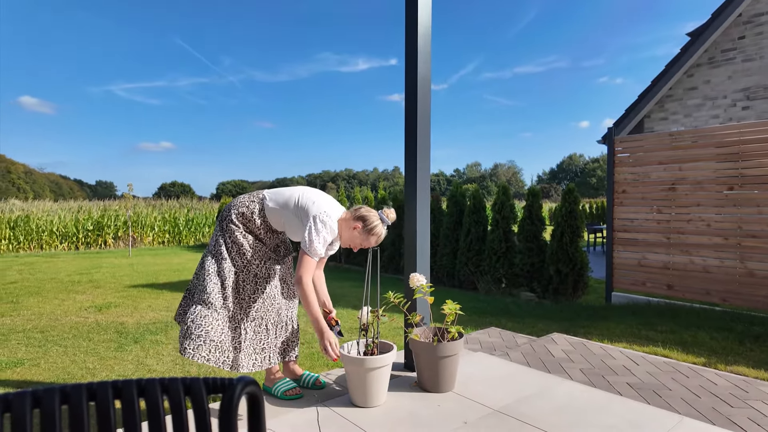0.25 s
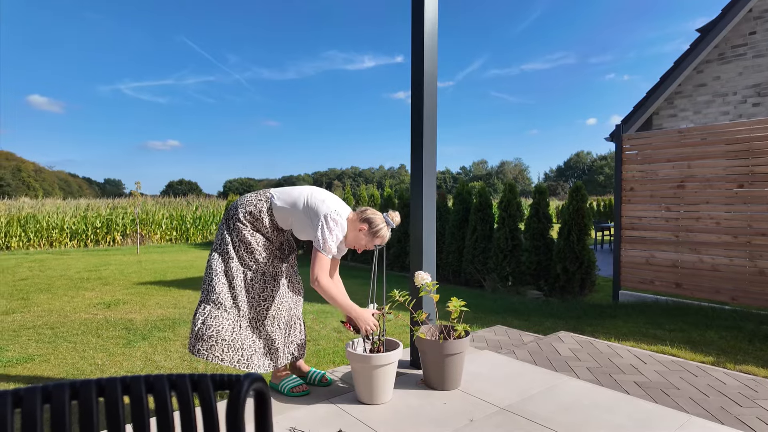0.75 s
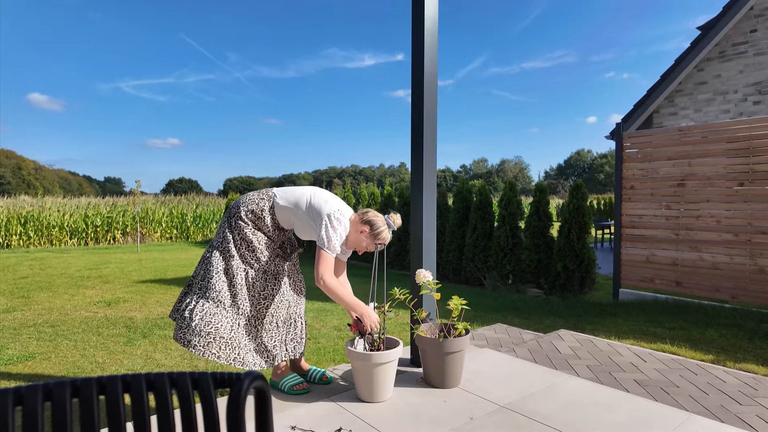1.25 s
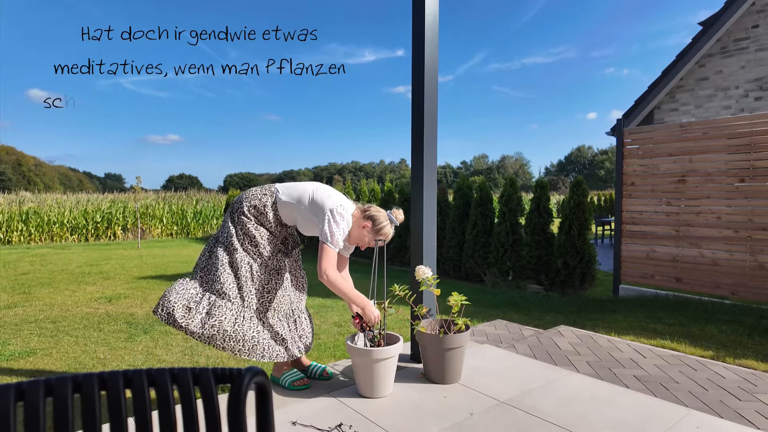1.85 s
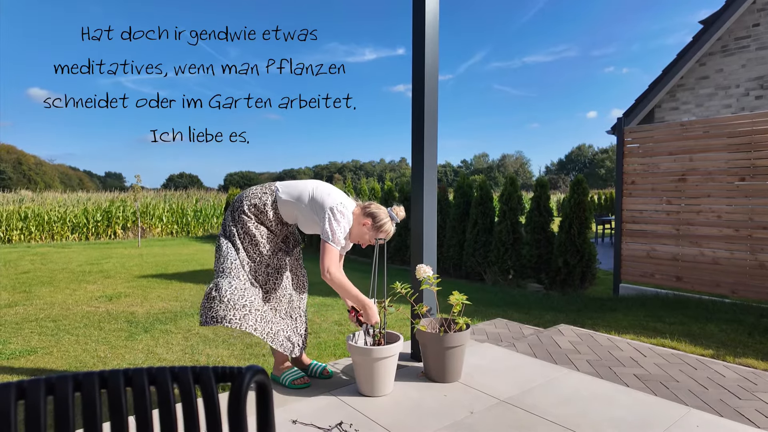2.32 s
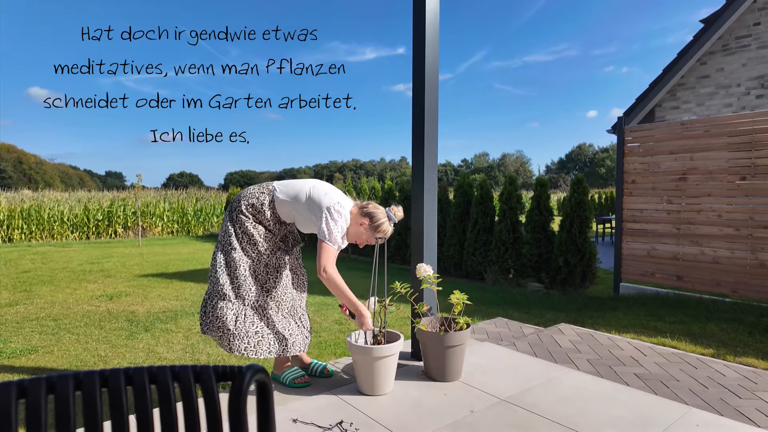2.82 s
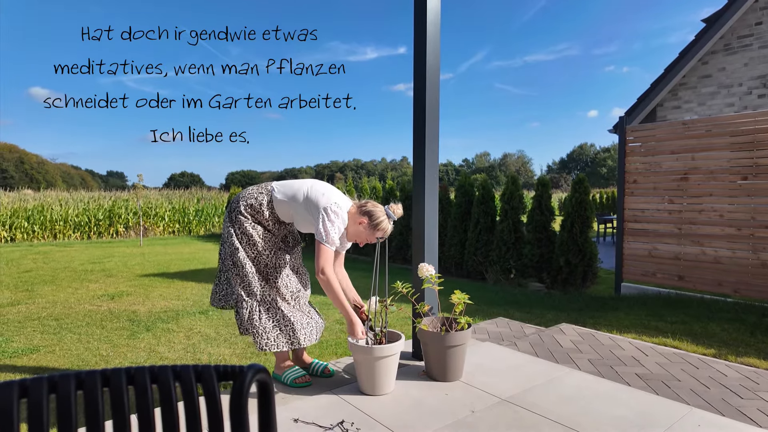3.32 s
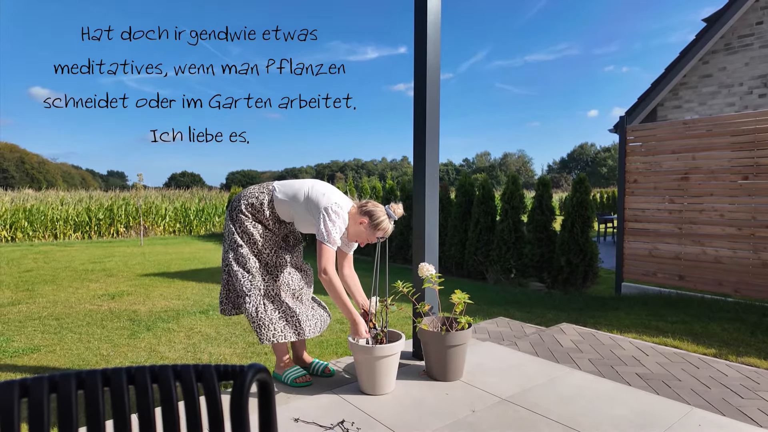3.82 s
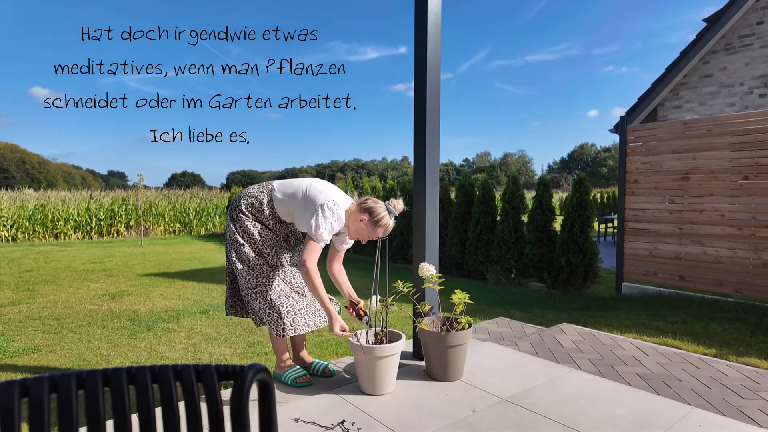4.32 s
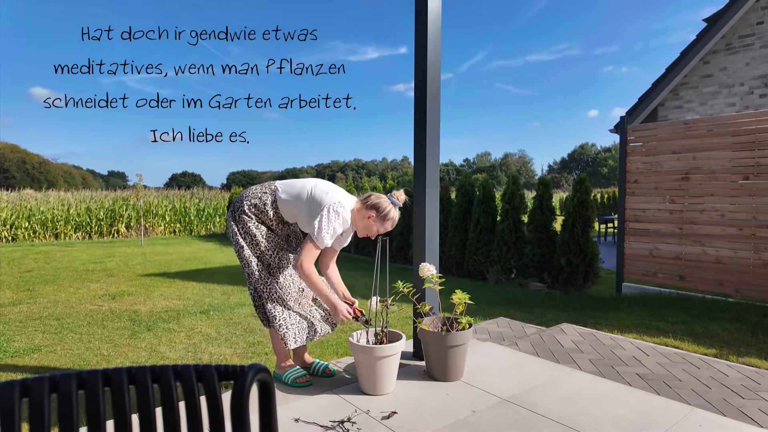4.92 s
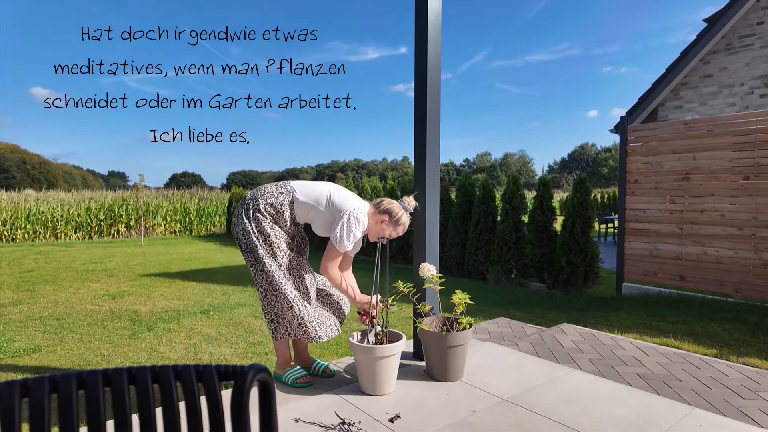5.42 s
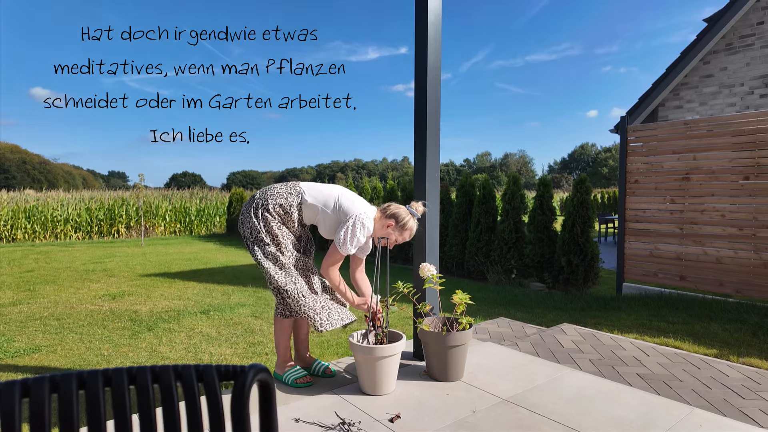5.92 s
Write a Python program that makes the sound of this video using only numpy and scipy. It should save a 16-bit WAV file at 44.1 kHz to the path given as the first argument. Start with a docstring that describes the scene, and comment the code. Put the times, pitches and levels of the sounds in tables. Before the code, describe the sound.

A few metres away on a quiet patio, a hand rummages in a potted plant. Dry stalks tick and snap, thickest between one and two seconds, then shears cut with a hard, ringing crack and a low thud. Sparser rustles and snaps follow until a second, brighter snip near four seconds. Spring clicks, a dull knock and small crackles finish, with short wall reflections over soft outdoor hush.

```python
"""Secateurs on a patio plant

Garden secateurs cut two stems of a potted plant a few metres away: split noise-like cracks through ringing
blades. Dry stalks snap and scrape and leaves rustle as a hand works through, all built from random impulses;
a cutting drops on the paving. The house wall and patio roof return the sound as a decaying noise tail.
Shaped noise makes the soft outdoor hush, low breeze and moving cloth."""
import sys
import numpy as np
from scipy import signal
from scipy.fft import rfft, irfft
from scipy.io import wavfile
from scipy.ndimage import uniform_filter1d

SR = 44100
rng = np.random.default_rng(int(sys.argv[2]) if len(sys.argv) > 2 else 0)


def put_to_file(sound):
    """Save the sound as 16-bit audio at rate SR, in the file named by the first command-line argument."""
    columns = np.atleast_2d(sound).T  # one column per channel
    safe = np.clip(columns, -1, 1)
    whole_steps = np.round(safe * 32767)
    wavfile.write(sys.argv[1], SR, whole_steps.astype(np.int16))


N = 271215
TIME = np.arange(N) / SR


def gain_of(db):
    """Decibels to amplitude."""
    return 10 ** (np.asarray(db) / 20)


def evened(x):
    """Scales to an rms of one."""
    return x / np.sqrt(np.mean(x ** 2) + 1e-20)


def read(points, hz):
    """Interpolates a spectrum on a log-frequency axis."""
    f, value = np.transpose(points)
    return np.interp(np.log(hz + 1), np.log(f + 1), value)


def level(curve):
    """Interpolates a curve in dB and returns a gain per sample."""
    return gain_of(np.interp(TIME, *np.transpose(curve)))


def add(mix, start_s, sound):
    """Mixes a sound in at its start time, in place."""
    part = mix[max(round(start_s * SR), 0):][:len(sound)]
    part += sound[:len(part)]


def coloured(x, points):
    """Filters a whole signal by a spectrum of (frequency [Hz], gain [dB])."""
    gain = gain_of(read(points, np.fft.rfftfreq(len(x), 1 / SR)))
    return irfft(rfft(x) * gain, len(x))


def causal(db):
    """Minimum-phase (quickest-dying) impulse response with this spectrum, by folding the cepstrum."""
    cepstrum = irfft(np.log(gain_of(db)))
    half = len(cepstrum) // 2
    cepstrum[1:half] *= 2
    cepstrum[half + 1:] = 0
    return irfft(np.exp(rfft(cepstrum)))


def lifts(modes, hz):
    """Sums Gaussian resonance peaks in dB from rows of (centre Hz, width Hz, lift dB)."""
    return sum(lift_db * np.exp(-2 * ((hz - centre_hz) / width_hz) ** 2)
               for centre_hz, width_hz, lift_db in modes)


def swells(rows):
    """Sums movements that grow and fade in a bell, down to 1/e at half their length from the middle."""
    return sum(gain_of(db) * np.exp(-(2 * (TIME - middle_s) / length_s) ** 2)
               for middle_s, length_s, db in rows)


# Outdoor hush spectrum: (frequency [Hz], relative density [dB per Hz])
HUSH_SPECTRUM = [(15, -44), (25, -13), (102, -2), (240, -4), (439, -10), (591, -6.5), (1020, -9),
                 (1950, -17.5), (4610, -20.5), (9570, -35), (11900, -45.5), (16000, -54.5)]


def hush(hush_db=-65.5):
    """Distant outdoor hush: steady noise, shaped by a spectrum."""
    air = coloured(rng.standard_normal(N), HUSH_SPECTRUM)
    air = coloured(air, [(28, -6.5), (45, -2.0)])
    return gain_of(hush_db) * evened(air)


# Gusts: (middle [s], length [s], level [dB])
BREEZE_GUSTS = [(0, 0.43, -75), (0.47, 0.41, -69), (0.98, 0.34, -65), (1.68, 0.25, -65.5),
                (2.03, 0.35, -71)]


def breeze(calm_db=-83.5):
    """Low breeze: bass-heavy noise, swelling above a calm floor."""
    spectrum = [(15, -20.0), (45, -3), (130, -2.5), (220, -8.5), (450, -33.0), (2000, -53.0)]
    air = evened(coloured(rng.standard_normal(N), spectrum))
    return (gain_of(calm_db) + swells(BREEZE_GUSTS)) * air


# Swishes of skirt and sleeves with each reach: (middle [s], length [s], level [dB])
CLOTH_REACHES = [(1.05, 0.12, -68), (1.8, 0.64, -71), (3.95, 0.61, -66), (6.05, 0.88, -72.5)]


def cloth(sway_db=-77):
    """Moving cloth: low-mid noise over a quiet sway, swelling with each reach."""
    spectrum = [(60, -40.0), (200, -3.5), (400, -1), (700, -5.5), (1500, -24.5), (4000, -20.0), (12000, -41.0)]
    swish = evened(coloured(rng.standard_normal(N), spectrum))
    return (gain_of(sway_db) + swells(CLOTH_REACHES)) * swish


# Patio decay: (frequency [Hz], t60 [s])
PATIO_DECAY = [(300, 0.11), (1500, 0.39), (4000, 0.18), (7000, 0.18), (12000, 0.036)]


def patio(x, tail_db=-18.0, wall_s=.0235, wall_db=-4, wall_spread_s=0.0018, early_db=-5.0, rise_s=0.0031):
    """Weak scatter from the paving, a cluster of echoes from the slatted house wall, then a short tail."""
    t = np.arange(SR // 2) / SR
    after_wall = 1 + 2 * gain_of(wall_db) * np.exp(-abs(t - wall_s) / wall_spread_s)
    density = np.where(t < wall_s, gain_of(early_db), after_wall) * np.minimum(t / rise_s, 1)
    hz, when_s, bands = signal.stft(rng.standard_normal(len(t)) * density, SR, nperseg=256)
    decay = gain_of(-60 * when_s / read(PATIO_DECAY, hz)[:, None])
    tail = signal.istft(bands * decay, SR, nperseg=256)[1]
    tail *= gain_of(tail_db) / np.linalg.norm(tail)
    tone = [(200, 2.5), (2500, -4.0), (5000, -1.5), (7000, -5.5), (9000, 3.0), (15000, -1.5)]
    return coloured(signal.oaconvolve(x, tail)[:N], tone)


# Hand brushing the foliage: (middle [s], length [s], stir level [dB])
HAND_BRUSHES = [(0.76, 0.19, -61.5), (1.11, 0.26, -61.5), (1.28, 0.34, -66), (1.5, 0.21, -72),
                (1.74, 0.51, -68), (2.18, 0.17, -64.5), (2.91, 0.31, -66.5), (3.3, 1, -74.5),
                (3.92, 0.28, -74), (5.04, 0.31, -65.5)]
# Jerks of the plant: (time [s], stir level [dB])
PLANT_SHAKES = [(0.557, -62), (1.976, -48), (2.318, -70), (2.745, -75), (3.981, -42), (4.075, -58),
                (4.815, -65), (5.349, -64)]


def stirring(still_db=-86.5, rise_s=0.0012, decay_s=0.04):
    """Foliage motion: smooth brushes of the hand, and shakes that start at once and die away."""
    stir = gain_of(still_db) + swells(HAND_BRUSHES)
    shiver = (1 - np.exp(-TIME / rise_s)) * np.exp(-TIME / decay_s)
    for start_s, db in PLANT_SHAKES:
        add(stir, start_s, gain_of(db) * shiver)
    return stir


# Leaf colour: (frequency [Hz], level [dB])
LEAF_SPECTRUM = [(300, -21.5), (1500, -10), (2250, -4.5), (2800, -8.5), (3450, 0), (5000, -2), (7000, -1),
                 (8500, -12.5), (11000, -16), (14000, -24.5), (16000, -38.5)]
# Dryness of the plant under the hand, scaled by its users: (time [s], treble [dB])
DRYNESS = [(0.35, 24.5), (0.75, 4), (1.25, 11), (1.42, 9), (1.8, 12.5), (2.02, 4.5), (2.9, 4), (4, 5),
           (5, 10.5), (6.15, 0.5)]


def foliage(stir, leaves_db=-3, leaf_count=30, grains_per_s=650, spread_db=6.5, grain_s=0.0008):
    """Leaves brush one another: each has its own tiny crackle, struck by random ticks of uneven size."""
    size = gain_of(spread_db * np.minimum(rng.exponential(1, N), 3)) * rng.choice([-1, 1], N)
    ticks = size * (rng.random(N) < grains_per_s / SR)
    leaf = rng.integers(0, leaf_count, N)
    t = np.arange(512) / SR
    crackles = rng.standard_normal((leaf_count, len(t))) * t * np.exp(-t / grain_s)
    rustle = sum(signal.oaconvolve(ticks * (leaf == k), crackle)[:N] for k, crackle in enumerate(crackles))
    rustle = evened(coloured(rustle, LEAF_SPECTRUM))
    treble = coloured(rustle, [(4000, -42.0), (6500, -8.0), (10000, -15.0)])
    return gain_of(leaves_db) * stir * (rustle + (level(DRYNESS) - 2.0) * treble)


# Dry stalk colour: (frequency [Hz], level [dB])
STALK_SPECTRUM = [(200, -19.5), (700, -21), (1650, -10), (2250, -5), (2830, -9.5), (3400, -1), (5000, -1.5),
                  (7000, -2.5), (8500, -5), (11000, -11.5), (14000, -19.5), (16000, -25)]


def snap(db, centre_hz, treble_db, give_s, decay_s=0.003, spread_db=6, uneven_db=3, thin_db=6):
    """A brittle stalk parts in one click, a tough one over many fibres; both ring, thin ones lack bass."""
    t, hz = np.arange(2048) / SR, np.fft.rfftfreq(2048, 1 / SR)
    sign, size, ripple = rng.standard_normal((3, len(t)))
    envelope = (1 - np.exp(-t / give_s)) ** 2 * np.exp(-t / decay_s)
    fibres = np.sign(sign) * gain_of(spread_db * size) * envelope
    fibres[0] = np.linalg.norm(fibres) * np.exp(-give_s / .0005)  # first click, weaker in tough stalks
    bump_db, octaves = 8, 0.11
    bump = bump_db * np.exp(-.5 * (np.log2((hz + 1) / centre_hz) / octaves) ** 2)
    smooth = uniform_filter1d(uniform_filter1d(ripple, size=24), size=24)
    uneven = uneven_db * evened(smooth)[:len(hz)]
    thin = thin_db * np.clip(np.log2(2 * (hz + 1) / centre_hz), -1, 0)
    treble = treble_db * np.clip((hz - 7000) / 3000, 0, 1)
    colour_db = read(STALK_SPECTRUM, hz) + bump + uneven + thin + treble
    sound = signal.fftconvolve(fibres, causal(colour_db))[:len(t)]
    peak_rms = np.sqrt(uniform_filter1d(sound ** 2, size=130).max())  # 3 ms windows
    return gain_of(db) * sound / peak_rms


def twigs(stir, above_leaves_db=4, range_db=12, most_db=-60.0, low_hz=3200, high_hz=7000,
          bright_db=-10, dry_lift=1.2, give_s=0.00043, count=280):
    """Small twigs snap at random, louder where the foliage is stirred and brighter where it is dry."""
    out = np.zeros(N)
    for k, (when, size, thinness) in enumerate(rng.random((count, 3))):
        at = int((k + when) / count * N)
        middle_db = min(20 * np.log10(stir[at]) + above_leaves_db, most_db)  # cap before the spread
        db = middle_db + range_db * (size - .5)
        centre_hz = low_hz * (high_hz / low_hz) ** thinness
        treble_db = bright_db + dry_lift * np.interp(TIME[at], *np.transpose(DRYNESS))
        add(out, TIME[at], snap(db, centre_hz, treble_db, give_s))
    return out


# Knocks on pot and paving: (time [s], level [dB], lowest resonance [Hz], its t60 [s])
POT_KNOCKS = [(0.2906, -54.5, 690, 0.023), (0.688, -63.5, 630, 0.035), (3.412, -65, 845, 0.06),
              (4.783, -54.5, 703, 0.023), (5.354, -62, 625, 0.023)]


def knocks():
    """Dull blows: a few short sine resonances, the higher ones dying sooner."""
    out, t = np.zeros(N), np.arange(SR // 5) / SR
    modes = [(1, 7.5), (1.2, -5), (1.9, 6), (2.4, 1), (3.1, 1.5)]  # (frequency ratio, level [dB])
    for start_s, db, hz, t60_s in POT_KNOCKS:
        for ratio, mode_db in modes:
            envelope = gain_of(db + mode_db - 60 * t * ratio / t60_s)
            add(out, start_s, envelope * np.sin(2 * np.pi * hz * ratio * t))
    return out


# Louder stalks and the cutting settling, level and treble before trim:
# (time [s], level [dB], resonance [Hz], treble [dB], give time [s])
STALK_CRACKS = [(0.2898, -49, 3600, 6, .0008), (0.475, -52.5, 5950, 19, .001),
                (0.5578, -42, 3830, -2, 0.00052), (0.6879, -42, 3800, -1.5, 0.00051),
                (0.707, -49, 4500, -10, 0.00023), (0.7527, -40.5, 3750, -16, 0.00099),
                (0.764, -46, 6600, 1, .0015), (0.7788, -44, 3800, 0, .0015),
                (0.8965, -44.5, 5300, -4, 0.0027), (0.9176, -44, 2500, -1, 0.00057),
                (0.9415, -51, 2330, -4, 0.00092), (1.04, -40, 3700, -4, 0.00084),
                (1.1017, -44, 4240, -17, .0015), (1.1356, -44, 3320, 3, 0.00073),
                (1.1586, -47.5, 6800, -10, 0.00089), (1.2325, -45, 7000, 7, 0.00026),
                (1.255, -42.5, 6900, 7, .0015), (1.2733, -39, 6460, 11, .002),
                (1.2915, -41, 6440, 7, .0012), (1.2997, -37.5, 6900, 0, 0.0013),
                (1.3466, -41, 3700, -10, .0002), (1.449, -48.5, 6770, -4, 0.0018),
                (1.487, -34.5, 5600, -3, 0.00088), (1.58, -38.5, 5870, -6, 0.00017),
                (1.59, -38.5, 6860, 5, .0003), (1.6185, -36.5, 6950, 6, .0001),
                (1.6732, -48.5, 7000, 9, .0001), (1.712, -39.5, 6660, 5, .0001),
                (1.729, -48, 6900, 3, .0001), (1.7483, -36, 6900, 0, .0001),
                (1.7562, -39, 6250, 3, 0.000091), (1.791, -36, 7040, 4, .0001),
                (1.8198, -37, 4300, 7, 0.00021), (1.828, -36.5, 6800, 0.5, .001),
                (1.8354, -40, 6900, 1, .0005), (1.8574, -45.5, 3550, 3, 0.00052),
                (1.8714, -37, 3600, 2.5, .0002), (2.1413, -44, 4400, -12, 0.00057),
                (2.183, -45.5, 4430, -8, 0.00018), (2.2124, -43.5, 4160, -3, 0.00037),
                (2.275, -43.5, 2140, -8, 0.00033), (2.325, -43, 7800, 9, .003),
                (2.3423, -34, 3340, -0.5, 0.00043), (2.383, -40.5, 3550, -6, .0004),
                (2.455, -44, 5070, 2, 0.00045), (2.4678, -43.5, 4800, -9, 0.0013),
                (2.7452, -45, 5370, 1, .0006), (2.772, -44, 4870, 0, 0.0026), (2.911, -42, 5470, -1, .002),
                (2.9665, -43.5, 3800, 1, .003), (3.1816, -42.5, 5300, -8, 0.00015),
                (3.2347, -51, 4240, -2, .001), (3.2896, -45.5, 4950, -4, 0.000092),
                (3.3666, -45.5, 4950, -4, 0.00011), (3.65, -49, 4700, -5, 0.00009),
                (3.802, -47, 4770, -6, 0.00026), (3.935, -38.5, 6200, -8, .0006),
                (4.048, -45, 3700, 0, .002), (4.115, -45, 7350, -2, 0.00072),
                (4.783, -49.5, 2100, 4.5, .0003), (4.8174, -39, 5260, -3, 0.00038),
                (4.9303, -44.5, 5700, 2, .0008), (4.953, -43, 6140, -2, 0.00095),
                (4.9783, -42, 6200, 7, 0.0012), (5.0046, -47.5, 7080, 5, .001),
                (5.027, -51, 5500, 2, 0.0027), (5.051, -52, 6300, 5, .0015),
                (5.351, -55, 2370, -7, 0.00046), (6.021, -44.5, 3360, -8, 0.0008)]


def stalks(trim_db=-6, treble_trim_db=-2):
    """The louder snaps, one stalk each."""
    out = np.zeros(N)
    for start_s, db, centre_hz, treble_db, give_s in STALK_CRACKS:
        add(out, start_s, snap(db + trim_db, centre_hz, treble_db + treble_trim_db, give_s))
    return out


# Stems dragged along one another:
# (start [s], length [s], level [dB], lowest resonance [Hz], brightness [dB per octave])
STEM_SCRAPES = [(1.48, 0.066, -57.5, 2300, -9), (2.117, 0.077, -73, 3240, 0), (2.314, 0.045, -51, 3340, 1),
                (2.374, 0.033, -54, 2140, -4.5), (3.908, 0.07, -58, 3300, 0.5),
                (4.062, 0.032, -42, 3250, 6), (4.814, 0.06, -53, 3330, 2), (5.995, 0.095, -62.5, 3400, 5.5),
                (6.082, 0.11, -63.5, 3390, 1)]
# Scraped stem resonances: (frequency ratio, width [Hz], lift [dB])
SCRAPE_MODES = [(1, 328, 11.5), (1.69, 400, 7.5), (2.18, 350, 9), (2.8, 498, 6.5)]


def scrapes(slips_per_s=1800, spread_db=4, skew=0.41):
    """A stem sticks and slips in a dense rasp that rings its resonances, swelling fast and fading slowly."""
    out, hz = np.zeros(N), np.fft.rfftfreq(1024, 1 / SR)
    for start_s, length_s, db, lowest_hz, tilt_db in STEM_SCRAPES:
        along = np.arange(0, 1, 1 / (length_s * SR))
        chance, sign, size = rng.random((3, len(along)))
        sizes = np.sign(sign - .5) * gain_of(-spread_db * np.log(size + 0.027))
        slips = (chance < slips_per_s / SR) * sizes
        modes = [(ratio * lowest_hz, width_hz, lift_db) for ratio, width_hz, lift_db in SCRAPE_MODES]
        tilt = tilt_db * np.log2(np.clip(hz / lowest_hz, .5, 3))
        colour_db = read(LEAF_SPECTRUM, hz) + lifts(modes, hz) + tilt
        rasp = evened(signal.fftconvolve(slips, causal(colour_db))[:len(along)])
        add(out, start_s, gain_of(db) * rasp * np.sin(np.pi * along ** skew) ** 2)
    return out


# Spring clicks as the jaws move: (time [s], level [dB], upper mode relative to lower [dB])
JAW_CLICKS = [(1.3772, -38, -12), (4.2398, -44, -16), (4.3773, -44, -1.5)]
# Spring modes, lower then upper: (frequency [Hz], t60 [s])
SPRING_MODES = [(3530, 0.016), (6900, 0.0093)]


def spring(tick_db=-7, treble_db=-9, give_s=0.00042):
    """The spring slips in its seat with a tick and rings briefly in two modes."""
    out, t = np.zeros(N), np.arange(2048) / SR
    for start_s, db, upper_db in JAW_CLICKS:
        for (hz, t60_s), mode_db in zip(SPRING_MODES, [db, db + upper_db]):
            add(out, start_s, gain_of(mode_db - 60 * t / t60_s) * np.sin(2 * np.pi * hz * t))
        add(out, start_s, snap(db + tick_db + upper_db / 2, SPRING_MODES[1][0], treble_db, give_s))
    return out


# Handles meeting their rubber stop: (time [s], peak level [dB], frequency [Hz])
HANDLE_STOPS = [(1.976, -37.5, 344), (3.986, -44.5, 340)]


def handle_stops(cycles=0.64):
    """The handles thud: a short cosine push, symmetric in a 20 ms window."""
    out, t = np.zeros(N), np.arange(-SR // 100, SR // 100) / SR
    for middle_s, db, hz in HANDLE_STOPS:
        push = np.exp(-abs(t * hz / cycles)) * np.cos(2 * np.pi * hz * t)
        add(out, middle_s - len(t) / SR / 2, gain_of(db) * push)
    return out


# The two cuts: (time [s], level [dB], blade ring factor, far-side break delay [s],
# far-side level [dB], travel time along the blades [s])
CUTS = [(1.9741, 1, 0.71, 0.00181, -4, 0.0025), (3.9801, 1, 1.52, 0.00071, -29.5, 0.001)]
# Blade resonances damped by stem and hand, lift before ring factor: (frequency [Hz], width [Hz], lift [dB])
BLADE_MODES = [(2446, 110, 8), (4010, 160, 10), (5110, 182, 6.5), (5880, 170, 7), (6960, 530, 10),
               (10000, 276, 9.5), (12350, 390, 7.5)]
# Crack spectra of the two stems: (frequency [Hz], level [dB])
FIRST_STEM_SPECTRUM = [(120, -24), (620, -16), (1000, -4.5), (1130, -21.5), (1600, -12.5), (2300, 4),
                       (2850, -5.5), (4300, 6.5), (6300, 5), (7100, -1.5), (8200, 1), (8800, -11),
                       (12500, -19), (14200, -43)]
SECOND_STEM_SPECTRUM = [(120, -33), (980, -12.5), (1550, -35.5), (2100, -1.5), (2450, -4.5), (2720, -11),
                        (3100, -0.5), (4000, 1), (5000, 3), (6100, -14), (7100, 4), (8600, 4), (9100, -16),
                        (13200, -20.5), (15000, -42)]


def snips(tear_db=-37, tear_s=0.002, clamp_s=0.0092):
    """One side of the stem cracks, then the other, as fibres tear; the blades ring until they clamp shut."""
    out, t, hz = np.zeros(N), np.arange(4096) / SR, np.fft.rfftfreq(4096, 1 / SR)
    blades_db = lifts(BLADE_MODES, hz)
    stems = [FIRST_STEM_SPECTRUM, SECOND_STEM_SPECTRUM]
    for (start_s, db, ring, far_s, far_db, travel_s), stem in zip(CUTS, stems):
        # bending waves in steel carry treble faster: each snip falls in pitch within 2 ms
        delay_s = travel_s * (np.sqrt(8000 / np.clip(hz, 3800, 8000)) - 1)
        dispersion = np.exp(-2j * np.pi * (np.cumsum(delay_s) - delay_s[0]) * hz[1])
        far_gain = gain_of(far_db + read([(5000, -7.0), (9000, -5.0)], hz))
        far_side = far_gain * np.exp(-2j * np.pi * hz * far_s)
        near_side = rfft(causal(db + read(stem, hz) + ring * blades_db))
        crack = irfft(near_side * dispersion * (1 - far_side))
        add(out, start_s, crack * np.exp(-(t / clamp_s) ** 4))
        fibres = evened(coloured(rng.standard_normal(len(t)), stem))
        add(out, start_s, gain_of(db + tear_db) * fibres * np.exp(-t / tear_s))
    return out


def scene(plant_room_db=6):
    """Work at the pot, its reflections and the garden; the plant radiates all round, so it echoes more."""
    background = hush() + breeze() + cloth()
    stir = stirring()
    plant = foliage(stir) + twigs(stir) + knocks() + stalks() + scrapes()
    tool = spring() + handle_stops() + snips()
    reflections = patio(tool + gain_of(plant_room_db) * plant)
    return (background + reflections + plant + tool)[None]


def record(dry, edge_hz=16000):
    """Band limit of the recorder: a linear-phase low-pass."""
    lowpass = signal.firwin(255, edge_hz, window=("kaiser", 8), fs=SR)
    return signal.oaconvolve(dry, lowpass[None], "same")


dry = scene()
out = record(dry)
put_to_file(out)
```